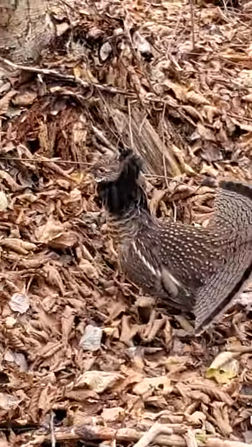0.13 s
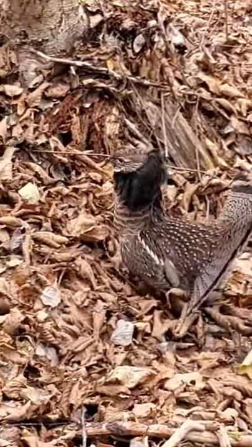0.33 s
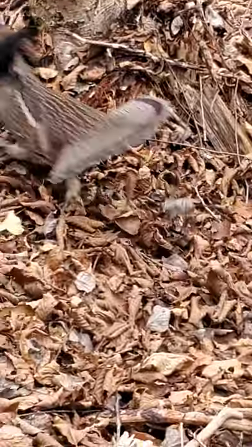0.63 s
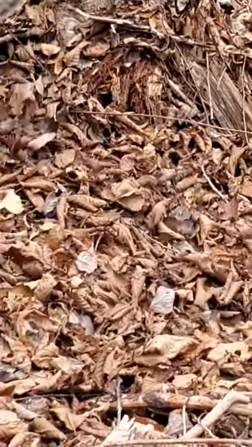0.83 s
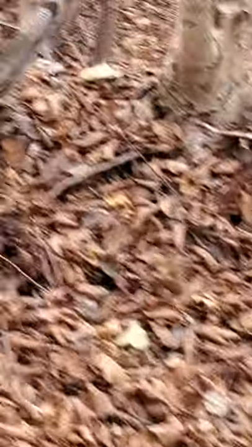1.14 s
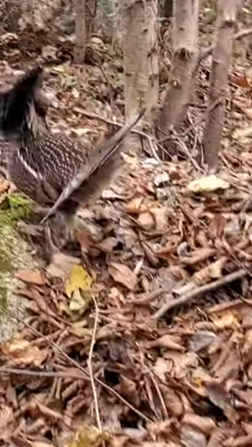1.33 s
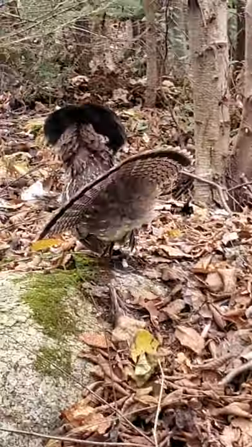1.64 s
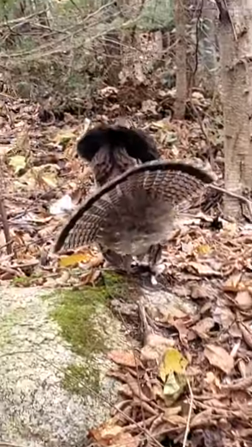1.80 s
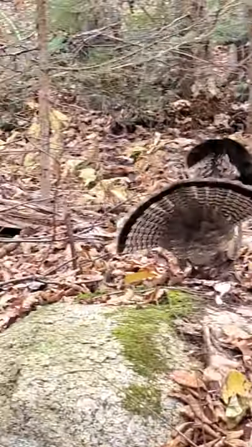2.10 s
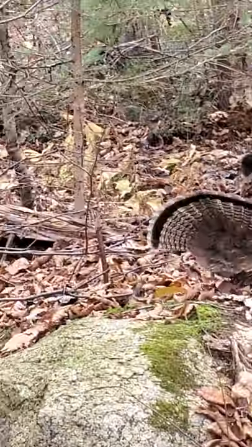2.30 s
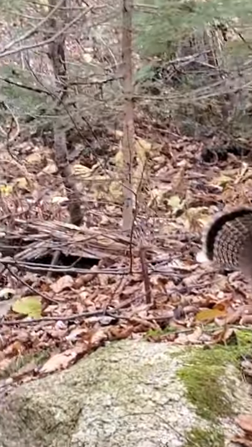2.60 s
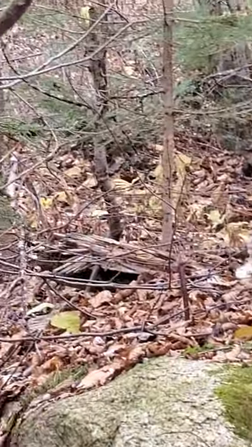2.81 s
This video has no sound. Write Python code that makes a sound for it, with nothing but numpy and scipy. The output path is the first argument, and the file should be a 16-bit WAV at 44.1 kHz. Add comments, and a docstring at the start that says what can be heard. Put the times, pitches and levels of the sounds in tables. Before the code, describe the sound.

Crisp rustling of leaf litter under a bird's feet, near the microphone and a little to the right. Light scuffs swell into a brief rush, then stop-and-start steps follow with sharp twig snaps and soft thuds in a still forest.

```python
"""A displaying grouse struts, dashes and struts on through dry leaf litter, close by in a quiet wood.
Leaves crumple in clumps of tiny cracks and rub on each other; stalks and twigs snap and ring.
Dull thumps sound from the damped ground, with soft low puffs and a few early scuffs.
The right microphone hears the bird first and brighter; the trees answer faintly."""
import sys
import numpy as np
from scipy import signal
from scipy.fft import rfft, irfft, next_fast_len
from scipy.io import wavfile
from scipy.ndimage import map_coordinates

SR = 44100
rng = np.random.default_rng(int(sys.argv[2]) if len(sys.argv) > 2 else 0)


def pcm_store(signal):
    """Save signal as 16-bit PCM."""
    levels = np.round(np.clip(np.atleast_2d(signal), -1, 1) * 32767)
    wavfile.write(sys.argv[1], SR, levels.astype(np.int16).T)


N = 130095
TOP_HZ = 16200

# Stirring of the litter: t/s, relative level/dB of crisp crackle, mid crunch, dull shuffle
STIR_LEVELS = [(0, -55, -60, -55), (0.04, -47, -54.5, -54), (0.15, -48, -51.5, -51),
               (0.23, -46.5, -50, -50), (0.265, -49, -48.5, -50.5), (0.29, -37, -41, -55),
               (0.35, -42.5, -47, -61.5), (0.41, -41, -42.5, -59), (0.43, -46, -56, -72),
               (0.46, -45.5, -46, -60), (0.51, -45, -50.5, -67.0), (0.57, -43.5, -47.5, -86),
               (0.62, -38.5, -45.5, -69), (0.66, -41.5, -42.5, -57), (0.7, -37, -42.5, -53),
               (0.756, -27, -33, -53), (0.8, -26.5, -33, -47), (0.85, -25.5, -33, -53),
               (0.895, -28, -35.5, -44), (0.925, -31, -36, -54), (0.99, -34.5, -43.5, -51.5),
               (1.06, -39, -46, -53), (1.14, -38.5, -46, -51.5), (1.18, -39.5, -41, -53),
               (1.24, -35, -41, -50), (1.28, -39, -44.5, -53.5), (1.314, -37, -42, -55.5),
               (1.37, -41, -47.5, -56), (1.47, -49, -55, -61), (1.57, -50, -56.5, -64),
               (1.65, -50, -55, -53.5), (1.801, -51.5, -59, -63.5), (1.86, -48, -54, -74),
               (1.91, -38, -47.5, -53), (1.958, -35.5, -42, -51), (2.04, -40, -50, -64.5),
               (2.112, -52, -55.5, -66), (2.18, -44.5, -46, -89), (2.23, -46.5, -50.5, -56.5),
               (2.29, -35.5, -43.5, -56), (2.4, -39.5, -46, -54), (2.52, -41.5, -48, -56),
               (2.56, -37, -44.5, -48.5), (2.62, -37, -43.5, -55), (2.71, -44, -50, -60.5),
               (2.81, -48, -52, -69), (2.86, -50, -58.5, -81), (2.94, -52, -58, -86)]
# Spectra of those three layers: f/Hz, level/dB
CRISP_SPECTRUM = [(1000, -71), (4000, -9), (5600, -8), (7000, -5.5), (8800, 1.5), (10400, -3.5),
                  (11700, 1.5), (13500, -0.5), (15500, -7.5)]
CRUNCH_SPECTRUM = [(100, -35), (500, -9.5), (1000, -6.5), (1500, -4), (2300, -3), (3600, 1), (4600, -3.5),
                   (5600, -10), (8000, -8), (15000, -44)]
SHUFFLE_SPECTRUM = [(25, -45), (65, -1.5), (130, -3), (420, 2.5), (800, -4), (1500, 1), (5000, -50.5)]
# Still air: f/Hz, level/dB
AIR_SPECTRUM = [(25, -13), (70, 1.5), (150, -13.5), (450, 0), (1000, 2.5), (4000, -13), (15000, -29)]
# Stalks and twigs breaking: t/s, relative level/dB, t60/s, body re crack/dB, tip f/Hz, stem f/Hz
TWIG_SNAPS = [(0.0522, -27.5, 0.038, -15, 13300, 3530), (.1041, -31, 0.006, -24, 12000, 3600),
              (0.1411, -40.5, 0.014, 7.5, 9100, 2350), (0.2097, -16.5, 0.002, -14.5, 12000, 2170),
              (0.249, -26.5, 0.052, -10.5, 11800, 3960), (0.2943, -30, 0.0091, 1.5, 12500, 3600),
              (0.3365, -26, 0.0038, -19, 11400, 3800), (0.3596, -33, 0.0039, 2, 14600, 3800),
              (0.4420, -26.5, 0.012, -12, 8900, 4730), (0.631, -27, 0.0099, -13, 6900, 4200),
              (0.741, -14, 0.0066, -12, 13500, 3230), (0.7692, -15, 0.009, -12, 11800, 3660),
              (0.819, -17, .012, -15, 9200, 4630), (0.8293, -15, 0.012, -9, 11500, 2200),
              (0.8523, -18, 0.017, -7, 9200, 4400), (0.8743, -10.5, 0.0035, -7, 8900, 4100),
              (0.9184, -18.5, 0.02, -4.5, 9300, 2370), (0.9292, -16, 0.005, -5, 11330, 4500),
              (0.961, -15.5, 0.013, -8, 8500, 3860), (0.972, -18, 0.0071, -8, 11400, 3800),
              (1.012, -18, .007, -26, 9600, 3960), (1.073, -24, .005, -13, 11150, 3570),
              (1.1094, -12, 0.0062, -8.5, 15100, 1640), (1.1690, -16, 0.008, -15, 14100, 2470),
              (1.1763, -22, 0.0089, 0, 8900, 4060), (1.1893, -20, .006, -11, 12060, 4630),
              (1.2648, -25, .005, -26, 11400, 4000), (1.303, -23.5, 0.013, -9, 9000, 4160),
              (1.321, -23.5, .005, -11, 9500, 2690), (1.5141, -35, .005, -5, 12300, 3360),
              (1.5944, -28, 0.009, -16, 11700, 3860), (1.7241, -33, .005, -10, 13140, 2540),
              (1.8757, -24.5, 0.014, -3.5, 12500, 3830), (1.8910, -20, 0.0065, -11, 9000, 4700),
              (1.9062, -29, .004, -20, 12500, 1590), (1.927, -3.8, 0.007, -12.5, 8170, 2890),
              (1.9310, -21, 0.079, -4.5, 11500, 2620), (1.9523, -23.5, 0.0059, -2, 10900, 2560),
              (2.0, -25, .005, -20, 10850, 4110), (2.0531, -29, 0.0059, -8, 12400, 5120),
              (2.1553, -35, 0.0062, -20, 13000, 4000), (2.1788, -22.5, 0.02, -12, 11400, 4300),
              (2.3567, -13, 0.0032, -24, 12100, 3170), (2.3766, -23, 0.0037, -3.5, 11500, 2650),
              (2.3954, -20, .005, -15, 11400, 3100), (2.4222, -29, .004, -18, 11500, 3830),
              (2.4508, -19, 0.015, -12, 13300, 2300), (2.4752, -12, 0.012, -12, 11900, 2820),
              (2.4884, -16, 0.0091, -11.5, 14900, 5170), (2.5393, -20, 0.063, -8.5, 11100, 3600),
              (2.5453, -20.5, 0.007, -3.5, 11500, 4240), (2.6000, -17.5, 0.0078, -25, 13400, 3330),
              (2.6400, -24, 0.0039, -12, 11500, 3780), (2.7457, -26, 0.0053, -31, 12100, 3800),
              (2.7788, -30, .005, -9, 8200, 3450), (2.9097, -34, .005, -10, 9710, 3320)]
# Spectra of a snap's crack and woody body: f/Hz, level/dB
SNAP_CRACK_SPECTRUM = [(300, -8), (2500, -25.5), (5600, -9), (7500, 0.5), (12000, 3), (15500, 0.5)]
SNAP_BODY_SPECTRUM = [(60, -18), (170, -9), (600, -1.5), (1200, -1.5), (2500, 0), (4000, 3), (7000, -3.5),
                      (15000, -36)]
# Blows on the ground: t/s, level/dB, lower mode f/Hz, t60/s
GROUND_THUMPS = [(0.142, -24.5, 324, 0.014), (0.204, -29, 109, 0.027), (0.299, -28, 564, 0.021),
                 (.755, -24, 244, 0.025), (0.919, -22.5, 410, 0.011), (1.082, -34.5, 220, 0.037),
                 (1.383, -17.5, 470, 0.014), (1.731, -20.5, 253, 0.016), (1.856, -42.5, 242, 0.032),
                 (1.929, -37, 196, 0.1), (2.474, -29, 366, 0.024), (2.541, -29.5, 189, 0.027)]
# Soft low puffs: t/s, level/dB, f/Hz, rise/s
AIR_PUFFS = [(0.209, -49, 75, 0.025), (0.826, -45, 65, .02), (1.261, -53, 70, 0.0064),
             (1.325, -45, 65.5, 0.0097), (1.733, -30, 73, 0.011), (1.975, -57, 60, 0.0092),
             (2.23, -48, 54, 0.014), (2.555, -40, 71.4, 0.01), (2.595, -46, 57, 0.028)]
# Scrapes through the leaves: peak t/s, level/dB, Gaussian sigma/s
LEAF_SCUFFS = [(0.31, -43, 0.011), (0.365, -42, 0.034), (0.46, -41, 0.037), (0.538, -44, 0.019),
               (0.596, -38, 0.018), (0.626, -35, 0.0078), (0.659, -44.5, 0.015), (0.716, -37.5, 0.034)]
# Their spectrum: f/Hz, level/dB
SCUFF_SPECTRUM = [(200, -23), (800, -13.5), (2200, -14.5), (4000, -4.5), (6800, -8), (9000, -9.5),
                  (15000, -11.5)]
# Likeness of left and right noise: f/Hz, coherence
COHERENCE = [(30, 0.41), (150, 0.92), (500, 1), (2300, 0.7), (4500, 0.61), (6000, 0.73), (12000, 0.39)]
# Shading at the left microphone: f/Hz, level re right/dB
LEFT_SHADE = [(60, -1.5), (400, -.5), (2500, -2), (4200, -2.5), (5800, .5), (6900, -2), (7700, -8),
              (9000, -12.5), (10400, -7.5), (11700, -11.5), (15000, -5.5)]


def amp(db):
    """Decibels to gain."""
    return 10 ** (np.asarray(db) / 20)


def unit_rms(x):
    """Scale to rms 1."""
    return x / np.sqrt(np.mean(x ** 2) + 1e-20)


def log_interp(points, hz):
    """Read (f/Hz, value) points on a log axis."""
    knots_hz, values = np.transpose(points)
    return np.interp(np.log(hz + 1), np.log(knots_hz + 1), values)


def wobble(knots_per_s):
    """Smooth random curve."""
    return map_coordinates(rng.standard_normal(N // 8), [np.arange(N) * knots_per_s / SR], mode="wrap")


def filtered(x, response):
    """Apply a complex frequency response."""
    size = next_fast_len(N + SR // 4, real=True)
    return irfft(rfft(x, size) * response(np.fft.rfftfreq(size, 1 / SR)), size)[..., :N]


def coloured(x, spectrum, keep_power=True, size=4096):
    """Minimum-phase filter through (f/Hz, level/dB) points."""
    gain = amp(log_interp(spectrum, np.fft.rfftfreq(size, 1 / SR)))
    cepstrum = irfft(np.log(unit_rms(gain) if keep_power else gain))
    causal_fold = np.r_[1, np.full(size // 2 - 1, 2), 1, np.zeros(size // 2 - 1)]
    impulse = irfft(np.exp(rfft(cepstrum * causal_fold)))
    return signal.fftconvolve(np.atleast_2d(x), impulse[None], axes=1)[:, :N]


def add(track, start_s, sound):
    """Mix a sound into a mono track."""
    part = track[round(start_s * SR):][:len(sound)]
    part += sound[:len(part)]


def stereo_noise():
    """White noise, left and right most alike in the low mids."""
    def mid_side_gains(hz):
        angle = np.arccos(log_interp(COHERENCE, hz)) / 2
        return np.array([np.cos(angle), np.sin(angle)])
    mid, side = filtered(rng.standard_normal((2, N)), mid_side_gains)
    return unit_rms(np.array([mid + side, mid - side]))


def leaf_cracks(rate_per_s=6500, spread_db=3, mean_t60_s=0.0017, jitter_s=12e-6):
    """Tiny cracks, each a damped ring with its own pitch, size and direction."""
    count, taps = int(rate_per_s * N / SR), np.arange(96)
    onset, pitch, rarity, life, phase = rng.random((5, count, 1))
    skew_s = jitter_s * rng.standard_normal((count, 1))
    t, hz = taps / SR, pitch * TOP_HZ
    peak_db = -spread_db * np.log(np.maximum(rarity, 0.004))
    envelope = amp(peak_db - 60 * t / (mean_t60_s * (0.5 + life)))
    indices = ((onset * N).astype(int) + taps).ravel()
    channels = []
    for delay_s in (skew_s, -skew_s):
        rings = envelope * np.sin(2 * np.pi * (hz * (t - delay_s) + phase))
        channels.append(np.bincount(indices, rings.ravel(), N)[:N])
    return unit_rms(np.array(channels))


def rustle(busy_db=-39):
    """Leaves crumple in clumps and rub on each other; hard stirring merges the cracks into a swish."""
    times_s, *levels_db = np.transpose(STIR_LEVELS)
    crisp_db, crunch_db, shuffle_db = [np.interp(np.arange(N) / SR, times_s, db) for db in levels_db]
    clumps = amp(1.52 * wobble(knots_per_s=62) + 0.06 * wobble(knots_per_s=420))
    rub_gain = amp(-4 + 0.25 * np.maximum(crisp_db - busy_db, 0))

    def leaves():
        return (leaf_cracks() + rub_gain * stereo_noise()) / np.hypot(1, rub_gain)
    crisp = amp(crisp_db + 4.5) * coloured(unit_rms(clumps * leaves()), CRISP_SPECTRUM)
    crunch = amp(crunch_db + 3.5) * coloured(unit_rms(clumps * leaves()), CRUNCH_SPECTRUM)
    shuffle = amp(shuffle_db + 2.5) * coloured(unit_rms(clumps * stereo_noise()), SHUFFLE_SPECTRUM)
    return crisp + crunch + shuffle


def still_air(level_db=-60):
    """Steady hush of the wood."""
    return amp(level_db) * coloured(stereo_noise(), AIR_SPECTRUM)


def snaps(scatter_db=-21, scatter_t60_s=0.05):
    """Each break is a sharp crack over a woody body, with a short scattered tail."""
    crack_power, body_power, t = np.zeros(N), np.zeros(N), np.arange(SR // 6) / SR
    for start_s, db, t60_s, body_db, _, _ in TWIG_SNAPS:
        direct = amp(db - 60 * t / t60_s)
        scattered = amp(db + scatter_db - 60 * t / scatter_t60_s)
        power = direct ** 2 + scattered ** 2
        add(crack_power, start_s, power)
        add(body_power, start_s, power * amp(body_db) ** 2)
    crack_noise = np.sign(stereo_noise())  # constant magnitude, so each sharp crack has a set loudness
    crack = coloured(np.sqrt(crack_power) * crack_noise, SNAP_CRACK_SPECTRUM)
    body = coloured(np.sqrt(body_power) * stereo_noise(), SNAP_BODY_SPECTRUM)
    return amp(0.5) * (crack + body)


def twig_rings():
    """The broken tip rings for a few cycles, the stem lower and longer."""
    out, t = np.zeros(N), np.arange(SR // 100) / SR

    def ring(hz, rise_s):
        return t / rise_s * np.exp(1 - t / rise_s) * np.sin(2 * np.pi * hz * t)
    for start_s, db, _, body_db, tip_hz, stem_hz in TWIG_SNAPS:
        tip = amp(db + 3.5) * ring(tip_hz, rise_s=0.0002)
        stem = amp(db + body_db - 2) * ring(stem_hz, rise_s=0.00048)
        add(out, start_s, tip + stem)
    return out


def thumps(upper_ratio=2.03, upper_db=-3.5, rise_s=0.0019):
    """Soft ground answers a blow with two heavily damped modes."""
    out, t = np.zeros(N), np.arange(SR // 5) / SR
    for start_s, db, hz, t60_s in GROUND_THUMPS:
        phase = 2 * np.pi * hz * t
        modes = np.sin(phase) + amp(upper_db) * np.sin(upper_ratio * phase)
        envelope = amp(db - 60 * t / t60_s) * (1 - np.exp(-t / rise_s))
        add(out, start_s, envelope * modes)
    return out


def puffs():
    """A few slow swings of air pressure swell and die away."""
    out, t = np.zeros(N), np.arange(SR // 5) / SR
    for start_s, db, hz, rise_s in AIR_PUFFS:
        envelope = amp(db) * (t / rise_s * np.exp(1 - t / rise_s)) ** 2
        add(out, start_s, envelope * np.sin(2 * np.pi * hz * t))
    return out


def scuffs():
    """Short scrapes straight ahead: swells of leaf cracks."""
    t = np.arange(N) / SR
    swell = sum(amp(db) * np.exp(-0.5 * ((t - peak_s) / sigma_s) ** 2)
                for peak_s, db, sigma_s in LEAF_SCUFFS)
    return swell * coloured(leaf_cracks(), SCUFF_SPECTRUM)


def trees(x, level_db=-20, t60_s=0.14):
    """Faint diffuse reflections from the trunks."""
    t = np.arange(SR // 2) / SR
    tail = rng.standard_normal((2, len(t))) * amp(-60 * t / t60_s)
    tail *= amp(level_db) / np.linalg.norm(tail[0])
    return signal.fftconvolve(x, tail, axes=1)[:, :N]


def from_right(x, lag_s=0.000432):
    """Sound from the right reaches the left microphone later and shaded."""
    shaded = coloured(x[0], LEFT_SHADE, keep_power=False)[0]
    left = filtered(shaded, lambda hz: np.exp(-2j * np.pi * hz * lag_s))
    return np.array([left, x[1]])


def scene():
    """Bird and wood to the right, scuffs in the centre."""
    litter = rustle() + snaps() + twig_rings()
    return from_right(litter + still_air() + thumps() + puffs() + trees(litter)) + scuffs()


def record(dry):
    """Clip at full scale, then band-limit."""
    return filtered(np.clip(dry, -1, 1), lambda hz: hz < TOP_HZ)


dry = scene()
out = record(dry)
pcm_store(out)
```